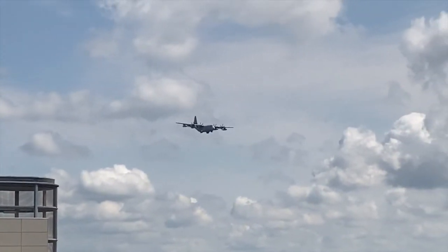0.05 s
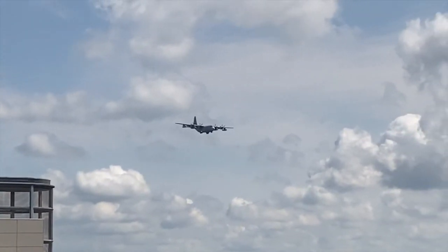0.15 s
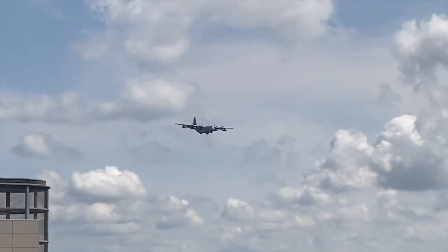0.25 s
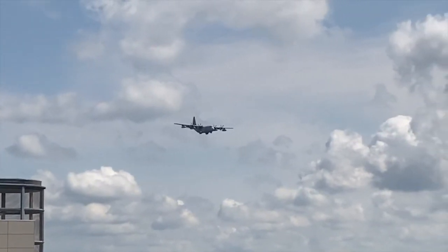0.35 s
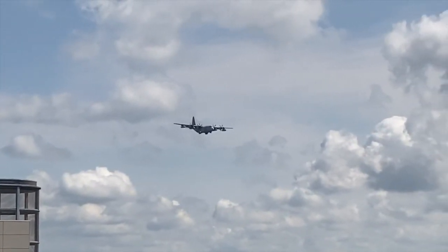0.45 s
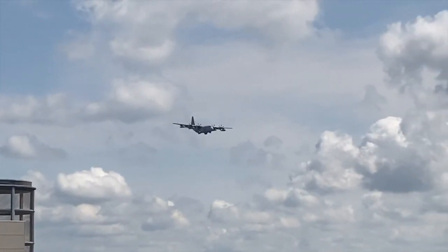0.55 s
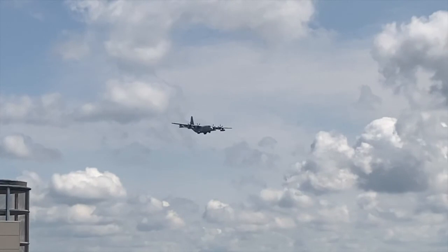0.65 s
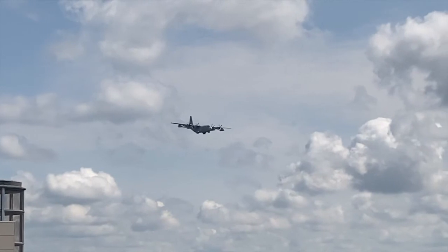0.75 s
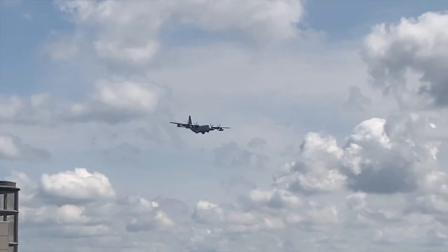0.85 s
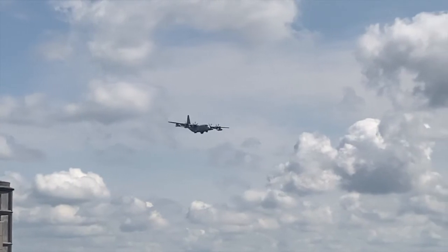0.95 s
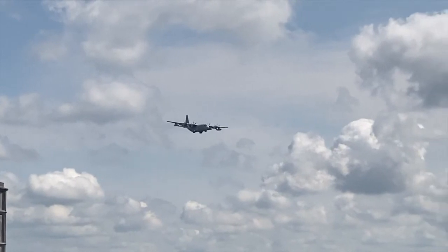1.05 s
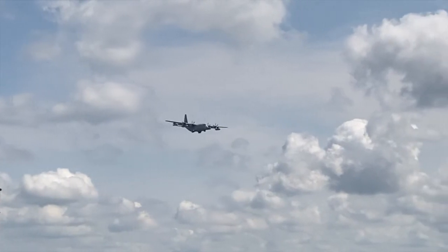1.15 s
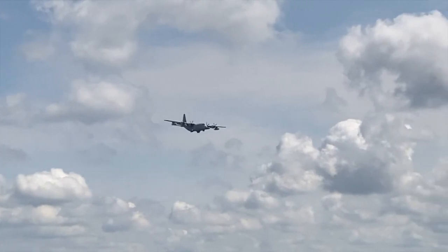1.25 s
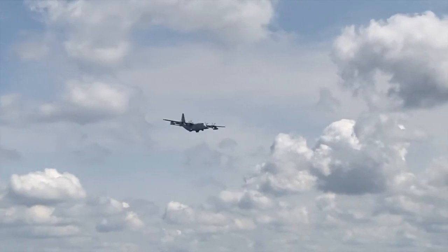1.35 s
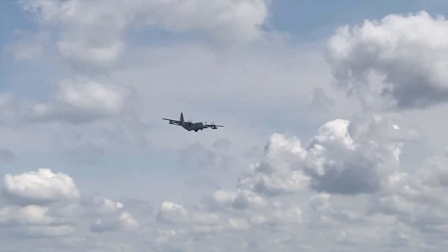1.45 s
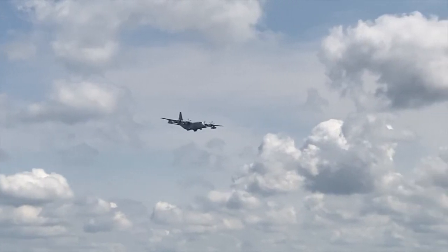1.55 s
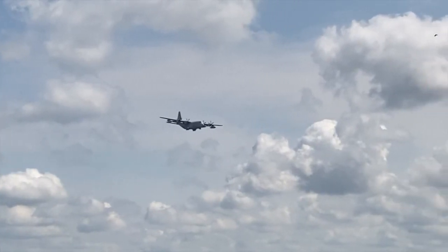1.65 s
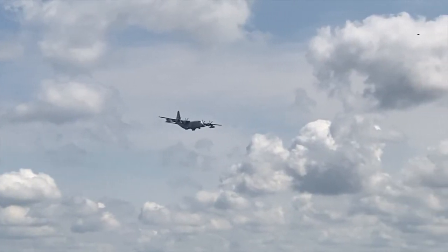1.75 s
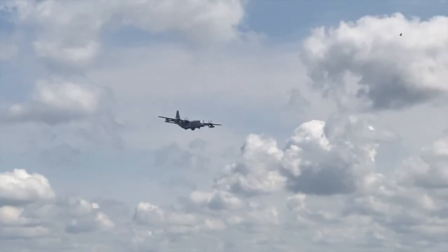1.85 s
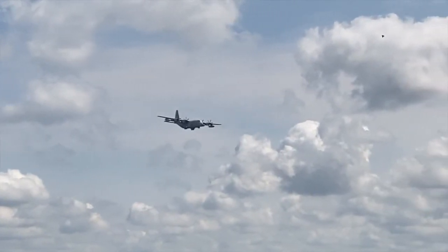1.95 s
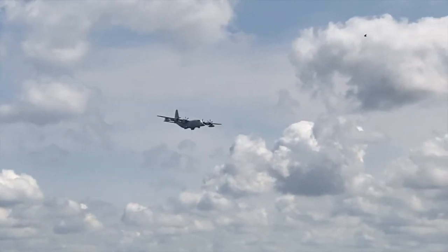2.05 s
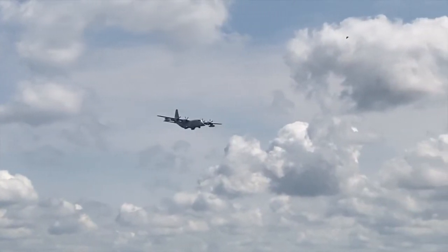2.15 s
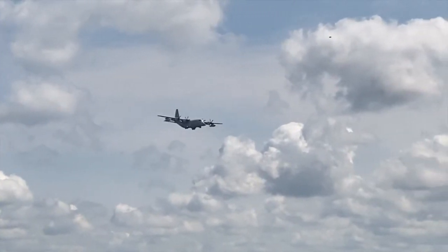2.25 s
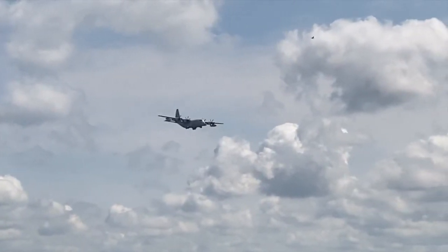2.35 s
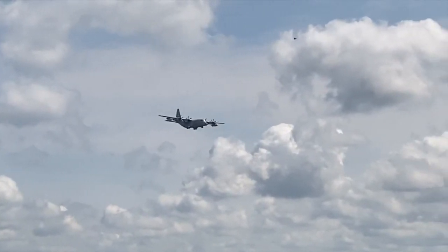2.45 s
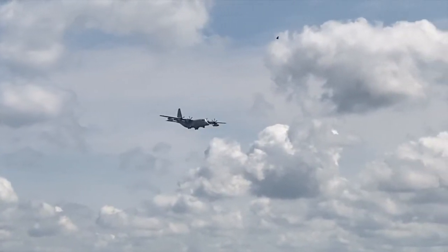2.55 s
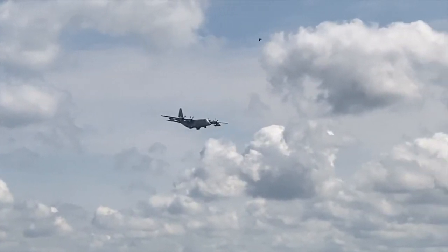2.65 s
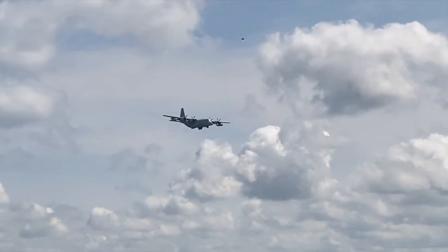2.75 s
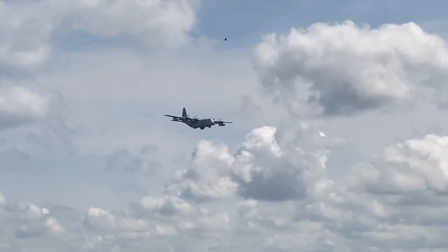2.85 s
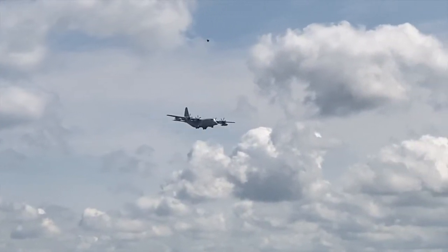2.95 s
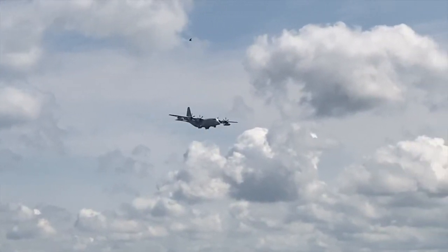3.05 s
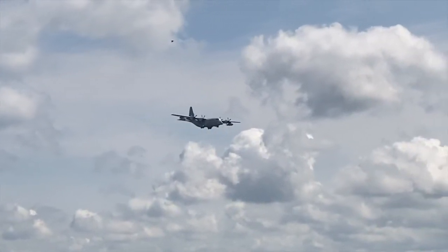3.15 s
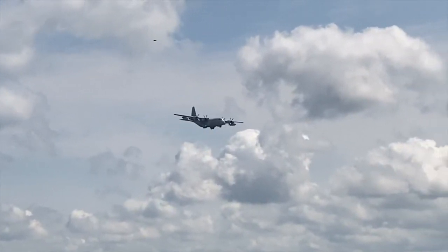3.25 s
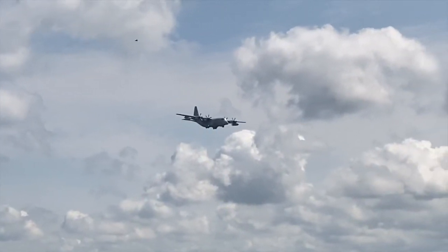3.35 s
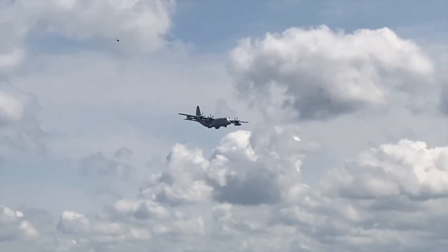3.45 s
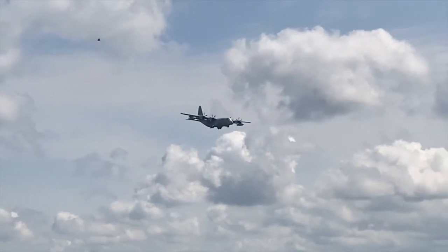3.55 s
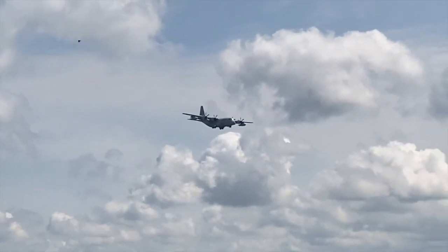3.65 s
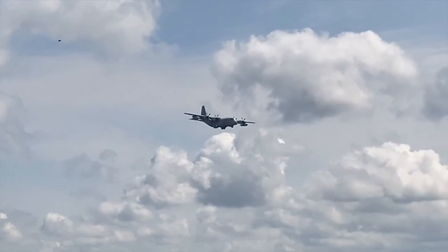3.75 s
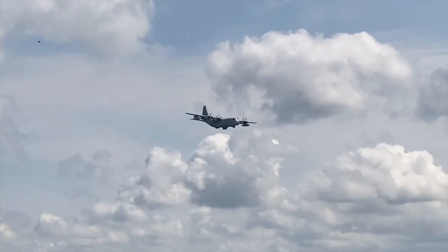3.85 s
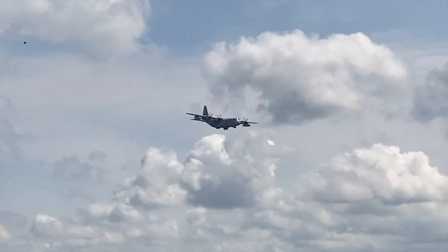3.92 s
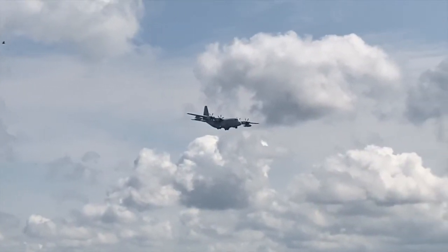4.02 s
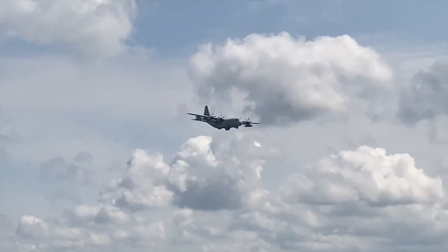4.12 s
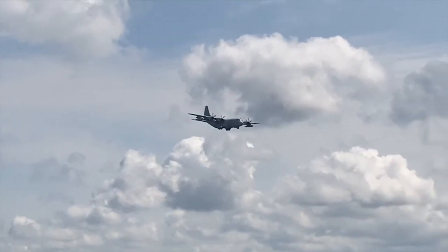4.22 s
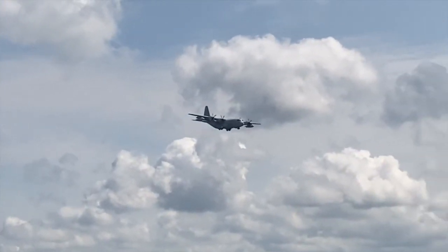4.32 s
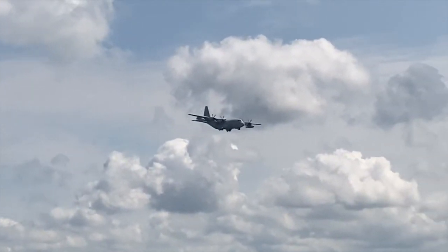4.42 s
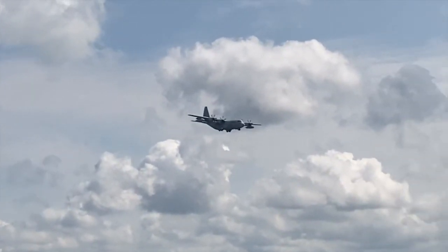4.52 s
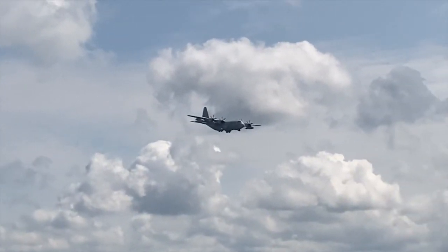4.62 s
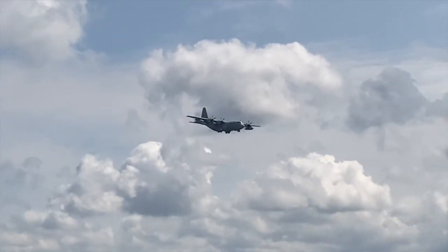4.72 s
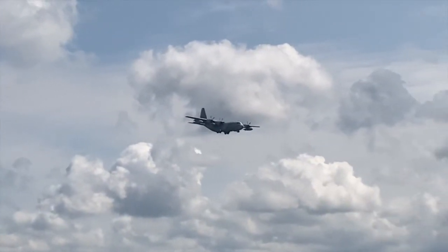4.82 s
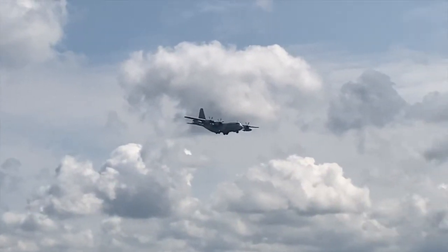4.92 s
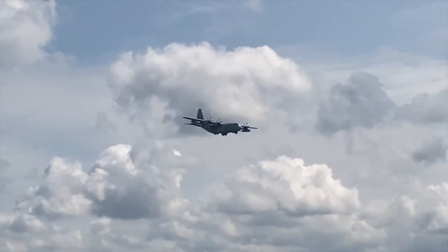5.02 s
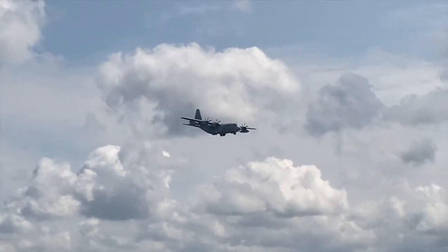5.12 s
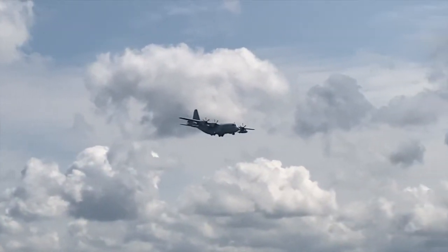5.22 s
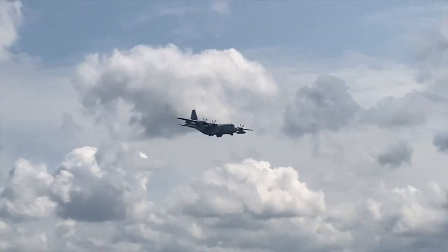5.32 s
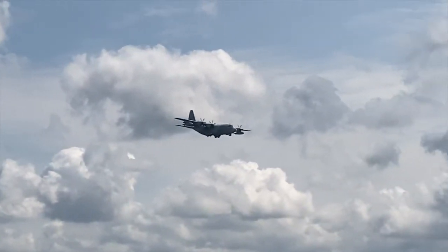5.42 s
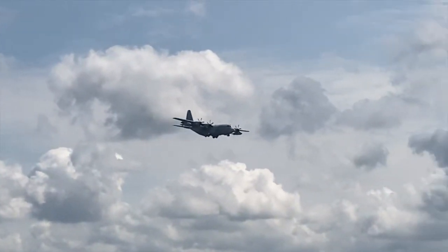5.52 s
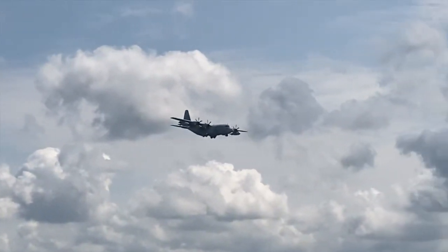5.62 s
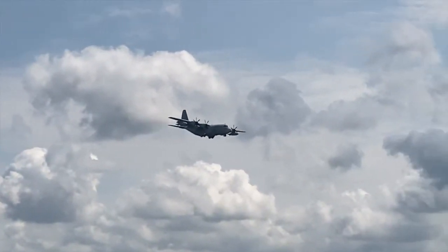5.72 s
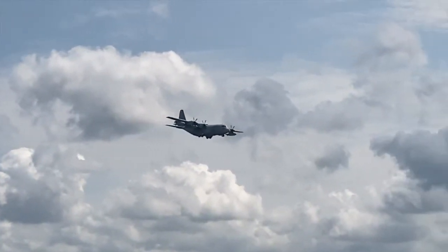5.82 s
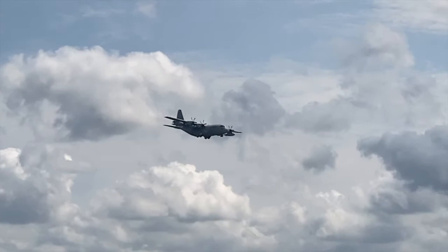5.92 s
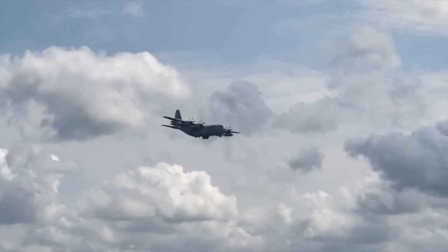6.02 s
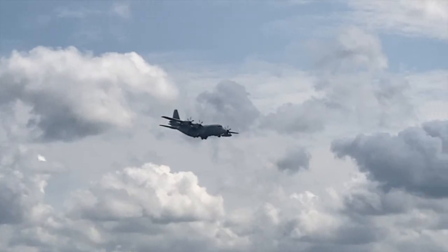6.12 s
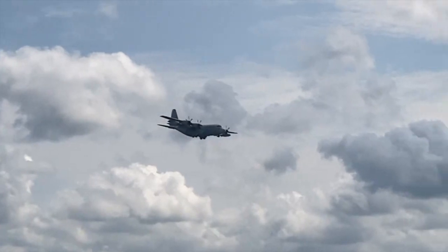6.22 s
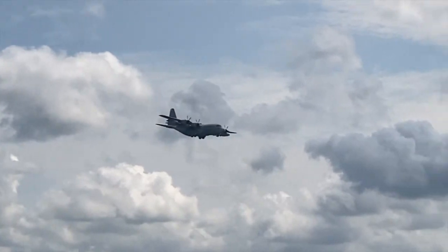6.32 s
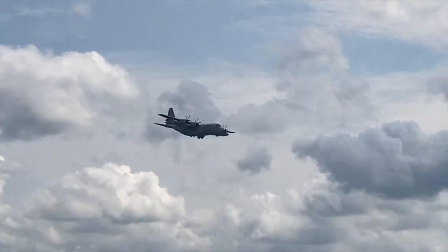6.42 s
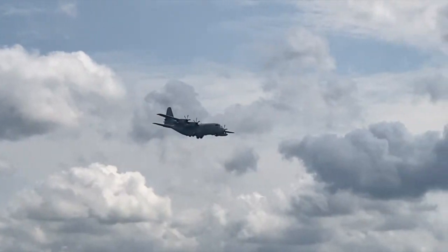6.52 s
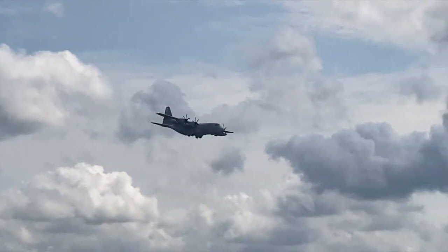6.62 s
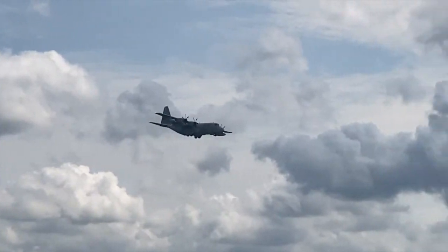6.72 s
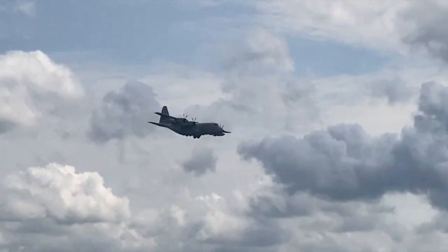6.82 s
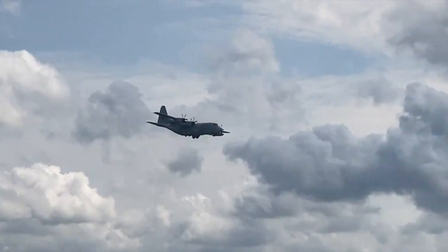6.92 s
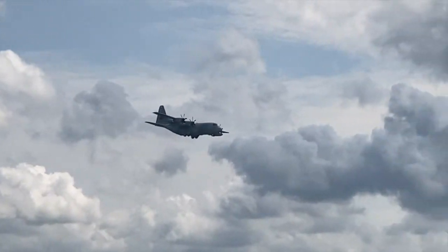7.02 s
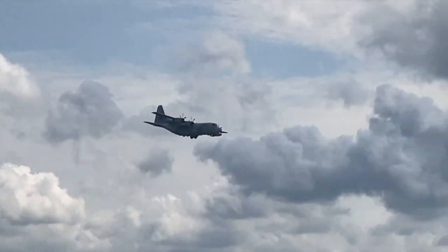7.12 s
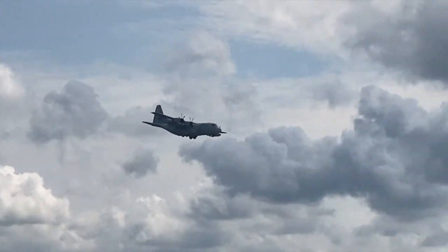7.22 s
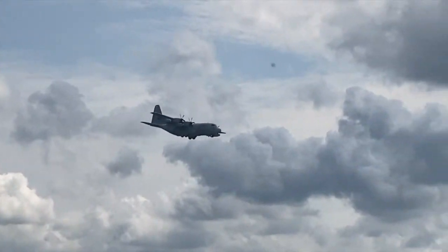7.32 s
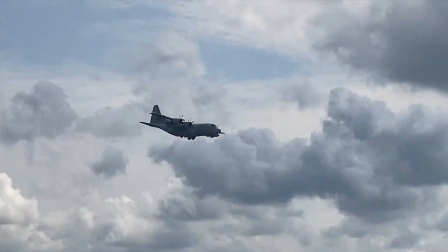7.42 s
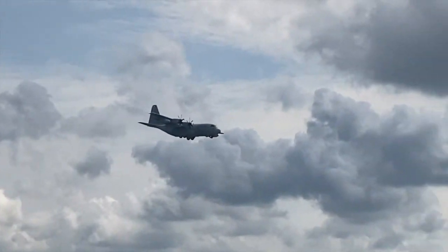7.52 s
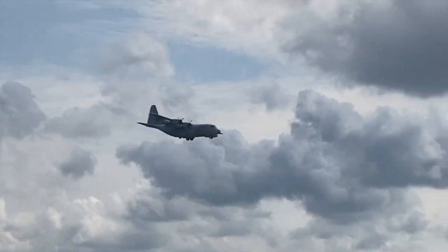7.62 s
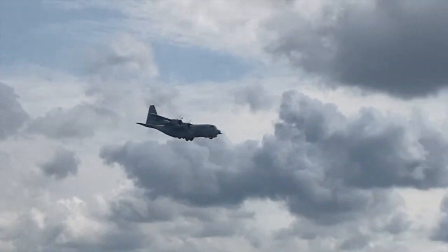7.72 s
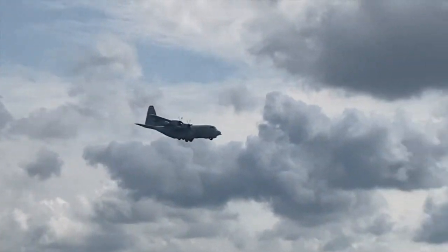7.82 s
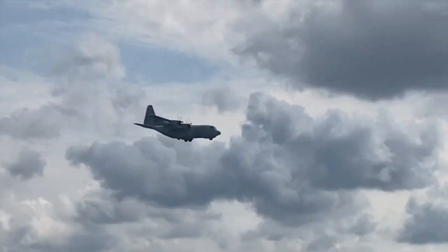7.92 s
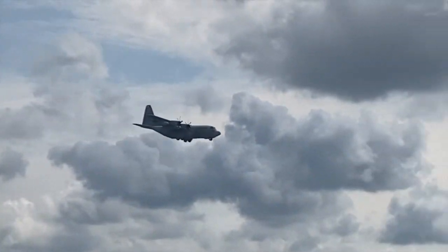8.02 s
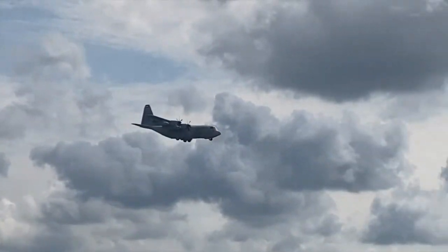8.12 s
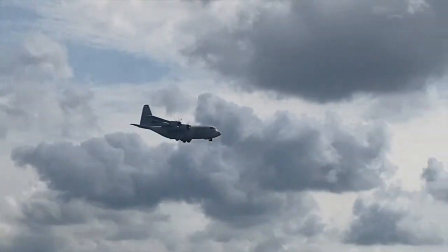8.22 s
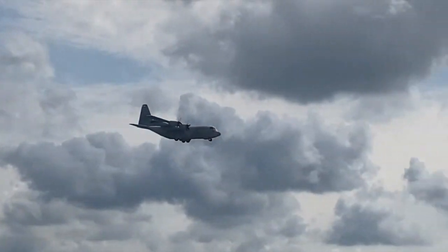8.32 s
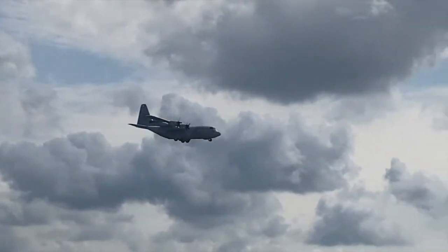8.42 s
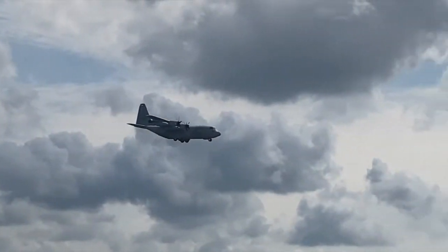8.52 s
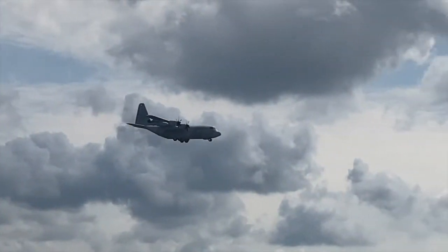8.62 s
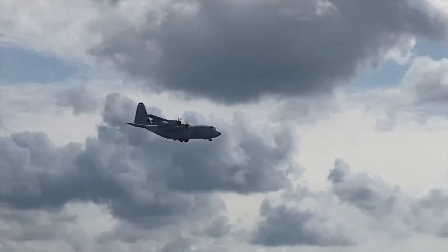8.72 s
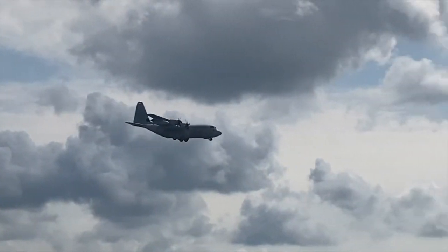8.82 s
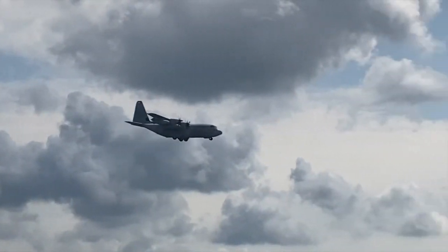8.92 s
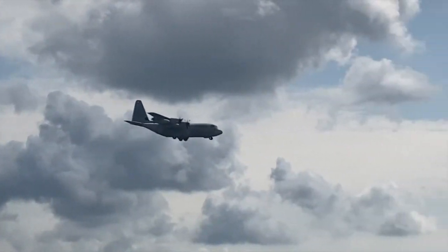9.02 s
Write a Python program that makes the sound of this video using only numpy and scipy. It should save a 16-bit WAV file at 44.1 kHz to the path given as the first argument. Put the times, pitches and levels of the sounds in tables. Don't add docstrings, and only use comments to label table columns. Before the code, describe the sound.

A heavy turboprop aircraft approaches across open ground, picked up by a small handheld stereo device. Muffled, uneven engine noise with hollow, shifting echo coloration and a delicate high whine comes first, along with three very faint thin insect tones. The noise builds in surges; near the end a deep, throbbing blade drone and its octave come forward with brighter hiss, and the plane is still loud at the close.

```python
import sys
import numpy as np
from scipy import signal
from scipy.fft import rfft, irfft, next_fast_len
from scipy.io import wavfile
from scipy.ndimage import map_coordinates

SR = 44100
rng = np.random.default_rng(int(sys.argv[2]) if len(sys.argv) > 2 else 0)


def unload_wav(signal):
    wavfile.write(
        sys.argv[1],
        SR,
        np.round(np.clip(np.atleast_2d(signal).T, -1, 1) * 32767).astype(np.int16),
    )


def volts_from_db(level):
    exponent = np.asarray(level, float) / 20
    return 10 ** exponent


N = 399546

# (pitch [Hz], level [dB per Hz])
ROAR_COLOUR = [(22, -59.5), (55, -47.5), (100, -60.5), (160, -52.5), (260, -51), (400, -57.5), (900, -62.5),
               (1800, -67), (2700, -65.5), (3600, -74.5), (5600, -89.5), (7200, -94), (8300, -97),
               (9500, -116)]
# (pitch [Hz], width [Hz], depth [dB])
ECHO_NOTCHES = [(585, 150, -9), (1470, 130, -6), (2230, 120, -8), (3070, 120, -8), (3950, 200, -4)]
# (pitch [Hz], width [Hz], lift [dB])
INTAKE_HISS = [
    (6150, 240, 6.5),
    (3370, 360, 2),
]
# (time [s], half length [s], lift [dB], extra lift in the rush [dB])
GUSTS = [(0.0, 0.23, 3, -2.5), (0.35, 0.16, 0.5, 3.5), (0.946, 0.34, -1.5, 0.5), (1.553, 0.083, 1, 0),
         (2.45, .12, 1.5, -1.5), (3.872, 0.22, 3, 0.9), (4.373, 0.093, -1.5, 1.1), (4.845, 0.2, 4.5, 0.2),
         (5.62, 0.22, 3.5, -0.4), (6.18, 0.17, -1, 0.7), (6.5, 0.1, 3, -0.3), (7.117, 0.21, -4.5, -0.2),
         (7.538, 0.14, 6.5, 0), (8.05, 0.068, 4, -2.8), (8.282, 0.083, -0.5, -2), (8.542, 0.065, 0, -0.2),
         (8.87, 0.16, -1, 1.2)]
# (time [s], half length [s], lift [dB])
RUMBLE_SURGES = [(0.9, 0.75, 0.5), (1.272, 0.09, 3.5), (2.056, 0.23, 3.5), (3.202, 0.66, -0.7),
                 (4.105, .2, 1.6), (4.45, .08, -1), (4.872, 0.079, -1), (5.684, .2, 2.5),
                 (6.104, 0.09, -2.2), (7.1, 0.24, -2), (7.7, 0.072, -1), (7.86, 0.063, -2.5),
                 (8.55, 0.14, 3.5)]
# (time [s], pitch [Hz], level [dB])
BLADE_TONE = [(0, 123.4, -45.5), (3.6, 121.5, -43), (4.9, 119.7, -43), (5.45, 120.4, -34.5),
              (6.1, 119.9, -38.5), (6.58, 118.6, -42), (6.68, 118.8, -31), (7.3, 115.8, -25.5),
              (7.55, 115.9, -21), (7.85, 115.4, -22.5), (8.33, 115.6, -18), (8.52, 115, -17.5),
              (8.72, 114.3, -20), (9.06, 112.3, -21.5)]
# (multiple of the blade pitch [1], time [s], half length [s], level above the hiss [dB])
TURBINE_WHINES = [
    (54.4, 3.6, 4.0, -1.5),
    (55.6, 2.5, 4.0, -4),
    (51.6, 3.0, 1.8, -9),
    (53.6, 8.0, .6, -6),
    (52.6, 7.9, .5, -8),
    (51.7, 7.8, .5, -9),
    (58.1, 7.7, .5, -3),
]
# (starting pitch [Hz], pitch change [Hz per s], level [dB])
ENGINE_DRONE = (98.6, -1.12, -43)
# (start [s], length [s])
INSECT_NOTES = [
    (.87, 0.63),
    (2.15, 0.68),
    (3.0, 0.35),
]
# (pitch [Hz], likeness [0-1], lead of the left [radians], left minus right [dB])
PORT_PAIR = [(30, .93, 0, -.3), (115, .985, .15, -.5), (400, .95, 0, 1), (700, .82, 0, -1),
             (1300, .83, .1, .8), (1900, .8, .9, 0), (2320, .7, 1.7, -3.6), (2900, .9, 2.3, -.2),
             (3450, .88, 2.5, .5), (3850, .4, 2.9, 2), (4500, .3, 2.0, 4.5), (6000, .55, 2.8, -.5),
             (6550, .4, 1.0, 4.5), (6950, .8, 0, 2), (8400, .72, -2.6, 0)]
# (pitch [Hz], width [Hz], lift [dB])
PORT_CAVITY = (6720, 240, 10)

FRAME, HOP = 1024, 256
SPEED_M_S, CLOSEST_M, ABEAM_S, NEAR_M = 70, 500, 13, 600
AIR_DB_PER_KM, AIR_POWER, TOP_DARKENING = 67, 2.61, 0.44 + 0.09
SPREAD_SHARE = 0.44
HISS_HZ, GUST_HZ, RUMBLE_HZ = 6600, 1100, 260
RUSH_HZ, RUSH_OCTAVES = 2800, 0.55
HISS_GUST_SHARE = 0.7
PATCHY_DB, FLUTTER_DB, SPECKLE_DB = 0.8, 0.6, 1.8
SLIDE_START, SLIDE_PER_S = 1.015, -0.004
FILL_S, FILL_SHARE = 6, 0.43
BEAT_S, BEAT_HALF_S, BEAT_DB = 6.955, 0.02, -13
OCTAVE_FAR_DB, OCTAVE_NEAR_DB, OCTAVE_IN_S, OCTAVE_RISE_S = -51, -34.5, 7.38, 0.06
HISS_NEAR_DB, WHINE_FADE_DB = -56, 12
WHISTLE_HZ, WHISTLE_DB, WHISTLE_EDGE_S = 4929, -72, 0.04
LAG_START, LAG_PER_S = -0.9, 0.17
BASS_CUT_HZ = 57
SELF_NOISE_DB, IMAGE_DB, IMAGE_HZ = -84, -61, 11014


def roar():
    white = rng.standard_normal((2, N))
    hz, times, frames = signal.stft(white, SR, nperseg=FRAME, noverlap=FRAME - HOP)
    pitch = hz[:, None]
    intake_db = sum(bell_peak(pitch, *row) for row in INTAKE_HISS)
    swell_db = path_db(pitch, times) + intake_db * abeam(times)

    colour_hz, colour_level = np.transpose(ROAR_COLOUR)
    colour_db = np.interp(np.log(hz + 1), np.log(colour_hz), colour_level)
    colour_db[hz > colour_hz[-1]] -= 40

    band = (3 * np.log2(hz / 40 + 1)).astype(int)
    shape = (band.max() + 1, len(times))
    patches_db = PATCHY_DB * drift(0.97, shape, SR / HOP)
    flutter_db = FLUTTER_DB * drift(16.0, shape, SR / HOP)
    eddies_db = (patches_db + flutter_db)[band]
    eddies_db += SPECKLE_DB * drift(2.8, swell_db.shape, SR / HOP)

    slide = SLIDE_START + SLIDE_PER_S * times
    ground_db = sum(bell_peak(pitch, at_hz * slide, width_hz, db) for at_hz, width_hz, db in ECHO_NOTCHES)
    filled = 0.5 + 0.5 * np.tanh(times - FILL_S)
    ground_db *= 1 - FILL_SHARE * (pitch < GUST_HZ) * filled

    steady_db = colour_db[:, None] + bell_peak(pitch, *PORT_CAVITY)
    gain = volts_from_db(steady_db + swell_db + eddies_db + ground_db) * np.sqrt(SR / 2)
    return signal.istft(frames * gain, SR, nperseg=FRAME, noverlap=FRAME - HOP)[1][:, :N]


def propellers(t):
    hz, first_db = in_time(BLADE_TONE, t)
    first_db = first_db + bumps([BEAT_S], [BEAT_HALF_S], [BEAT_DB], t)
    second_db = OCTAVE_FAR_DB + (OCTAVE_NEAR_DB - OCTAVE_FAR_DB) * abeam(t)
    phase = 2 * np.pi * np.cumsum(hz) / SR + 0.053 * wobble(8.6)
    first = volts_from_db(first_db + 0.39 * wobble(6.6)) * np.sin(phase)
    second = volts_from_db(second_db + 0.8 * wobble(3.5)) * np.sin(2 * phase + 0.8)
    return np.sqrt(2) * (first + second)


def turbines(t):
    coarse = t[::HOP]
    hiss_db = HISS_NEAR_DB + np.interp(t, coarse, path_db(HISS_HZ, coarse))
    blade_hz = in_time(BLADE_TONE, t)[0]
    out = 0
    for multiple, s, half_s, over_db in TURBINE_WHINES:
        facing_db = over_db - WHINE_FADE_DB * ((t - s) / half_s) ** 2
        whine_hz = multiple * blade_hz + 22.0 * wobble(30.0)
        out = out + tone(whine_hz, hiss_db + facing_db + 2.5 * wobble(12.0))
    return out


def far_drone(t):
    hz, hz_per_s, level_db = ENGINE_DRONE
    return tone(hz + hz_per_s * t + 0.4 * wobble(1.5), level_db + 2.5 * wobble(1.5))


def whistle(t):
    gate = 0
    for start, length in INSECT_NOTES:
        nearest_edge = np.minimum(t - start, start + length - t)
        gate = gate + np.clip(nearest_edge / WHISTLE_EDGE_S, 0, 1)
    return gate * tone(WHISTLE_HZ + 2.8 * wobble(6.7), WHISTLE_DB + 1.5 * wobble(5.0))


def path_db(hz, t):
    range_m = np.hypot(CLOSEST_M, SPEED_M_S * (ABEAM_S - t))
    pitch_loss = np.minimum(hz / HISS_HZ, 1.3) ** AIR_POWER
    air_db = AIR_DB_PER_KM * pitch_loss * (range_m - NEAR_M) / 1000
    air_db = air_db + np.maximum(air_db, 0) * TOP_DARKENING * np.clip((hz - HISS_HZ) / 1000, 0, 2)
    spread_db = SPREAD_SHARE * 20 * np.log10(range_m / NEAR_M)

    s, half_s, lift_db, rush_db = np.transpose(GUSTS)
    octaves = np.log2(hz / RUSH_HZ + 1e-9) / RUSH_OCTAVES
    rush = 1.5 * np.exp(-0.5 * octaves ** 2)
    gust_db = bumps(s, half_s, lift_db, t) + rush * bumps(s, half_s, rush_db, t)
    gust_db = gust_db * np.interp(hz, [RUSH_HZ, HISS_HZ], [1, HISS_GUST_SHARE])

    high = np.clip(np.log(hz / RUMBLE_HZ + 1e-9) / np.log(GUST_HZ / RUMBLE_HZ), 0, 1)
    surge_db = bumps(*np.transpose(RUMBLE_SURGES), t)
    return high * gust_db + (1 - high) * surge_db - spread_db - air_db


def abeam(t):
    return 0.5 + 0.5 * np.tanh((t - OCTAVE_IN_S) / OCTAVE_RISE_S)


def ports(direct, scattered):
    size = next_fast_len(N + FRAME)
    hz = np.arange(size // 2 + 1) * SR / size
    alike, lead, pan_db = in_time(PORT_PAIR, hz)
    alike = np.clip(alike, 0, 1)
    same = np.sqrt((1 + alike) / 2) * rfft(direct, size)
    other = np.sqrt((1 - alike) / 2) * rfft(scattered, size)
    left = (same + other) * volts_from_db(pan_db / 2) * np.exp(0.5j * lead)
    right = (same - other) * volts_from_db(-pan_db / 2) * np.exp(-0.5j * lead)
    return irfft([left, right], size)[:, :N]


def in_time(rows, times):
    s, *columns = np.transpose(rows)
    return [np.interp(times, s, c) for c in columns]


def bumps(s, half_s, size, t):
    widths = np.maximum(half_s, 0.02)
    return sum(h * np.exp(-0.5 * ((t - at) / w) ** 2) for at, w, h in zip(s, widths, size))


def bell_peak(hz, at_hz, width_hz, db):
    return db / (1 + ((hz - at_hz) / width_hz) ** 2)


def drift(rate, shape, per_s):
    r = np.exp(-2 * np.pi * rate / per_s)
    white = rng.standard_normal(shape[:-1] + (shape[-1] + 400,))
    slow = signal.lfilter([1], [1, -2 * r, r * r], white)[..., 400:]
    return slow / slow.std()


def wobble(rate):
    slow = drift(rate, (N // HOP + 2,), SR / HOP)
    return np.interp(np.arange(N) / HOP, np.arange(len(slow)), slow)


def tone(hz, db):
    turns = np.cumsum(hz) / SR + rng.random()
    return np.sqrt(2) * volts_from_db(db) * np.sin(2 * np.pi * turns)


def scene():
    t = np.arange(N) / SR
    direct, scattered = roar()
    direct = direct + propellers(t) + turbines(t) + far_drone(t) + whistle(t)
    left, right = ports(direct, scattered)
    lag = LAG_START + LAG_PER_S * t
    right = map_coordinates(right, [np.arange(N) - lag], order=3, mode="nearest")
    return np.array([left, right])


def roll_off(x):
    return signal.sosfilt(signal.butter(12, 14200, fs=SR, output="sos"), x)


def record(dry):
    bass_cut = signal.butter(4, BASS_CUT_HZ, "high", fs=SR, output="sos")
    cut = signal.sosfilt(bass_cut, dry)
    noise = volts_from_db(SELF_NOISE_DB) * rng.standard_normal(dry.shape)
    mirror = np.cos(2 * np.pi * IMAGE_HZ * np.arange(N) / SR)
    image = volts_from_db(IMAGE_DB) * cut.mean(axis=0) * mirror
    return roll_off(cut + noise + image)


dry = scene()
out = record(dry)
unload_wav(out)
```